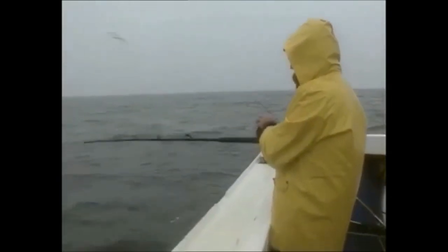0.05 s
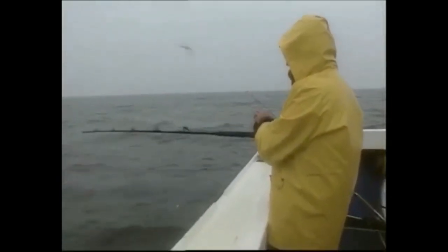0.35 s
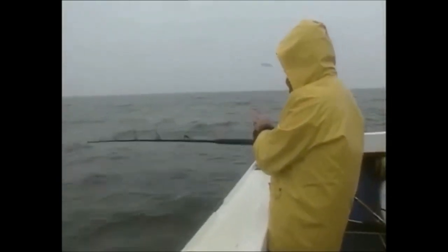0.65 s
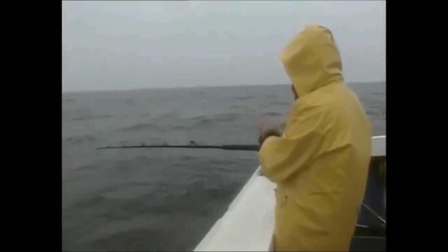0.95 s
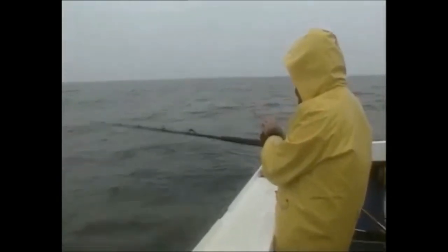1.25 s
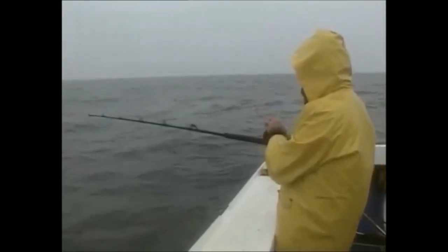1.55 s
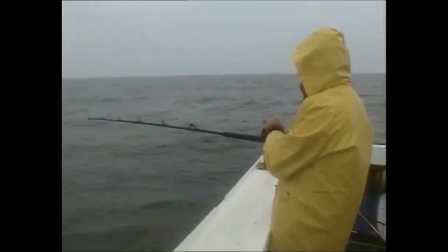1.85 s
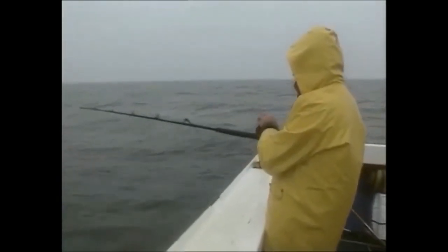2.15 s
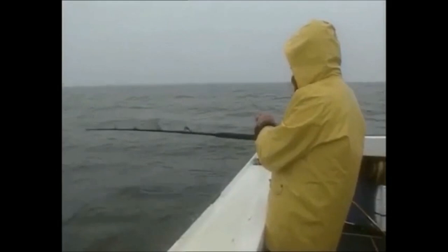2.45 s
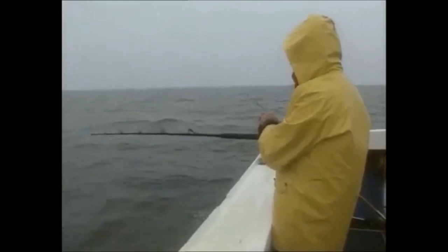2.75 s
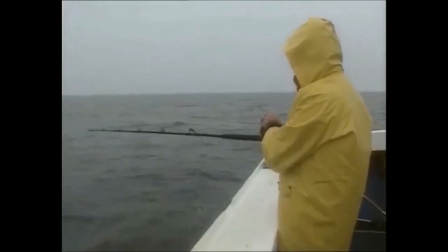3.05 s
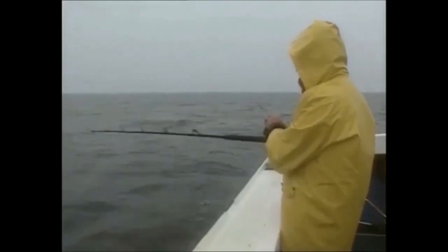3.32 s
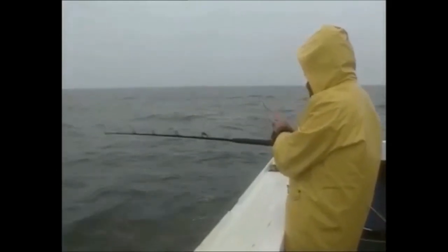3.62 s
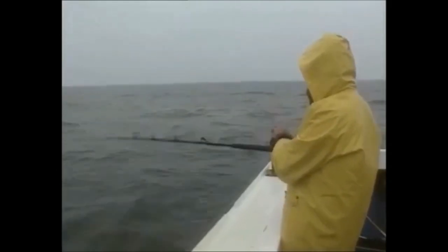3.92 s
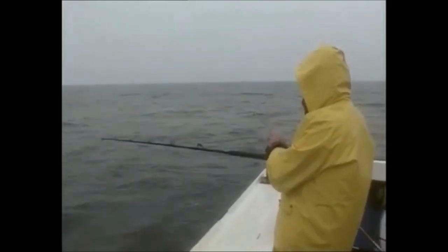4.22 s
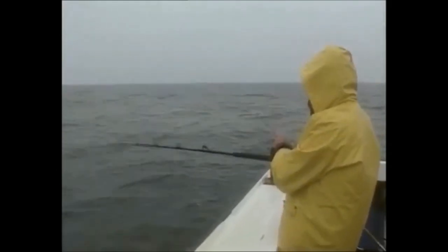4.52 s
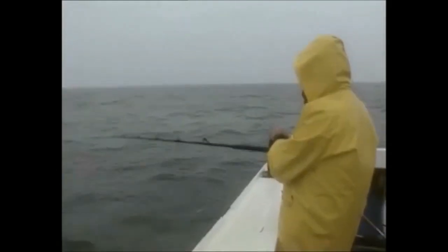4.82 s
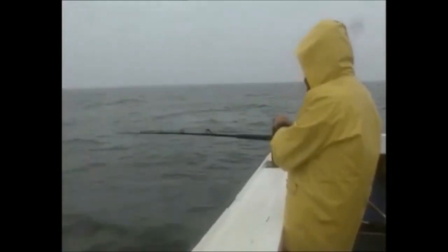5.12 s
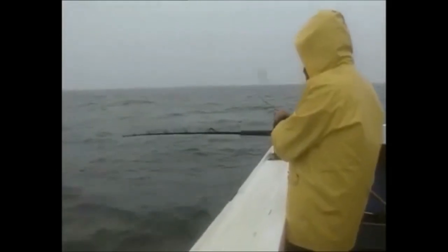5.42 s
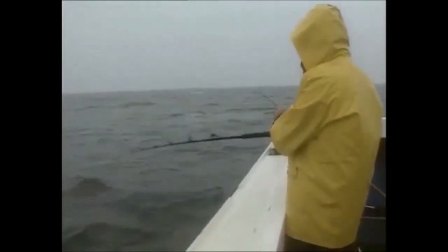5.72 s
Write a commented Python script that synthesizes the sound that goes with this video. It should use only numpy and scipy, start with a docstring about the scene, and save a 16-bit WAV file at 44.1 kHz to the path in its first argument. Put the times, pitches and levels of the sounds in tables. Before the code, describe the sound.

Line pulls off a fishing reel in bursts of rapid, bright clicking, while wind buffets the microphone and water washes along the hull.

```python
"""On a boat at sea, line is pulled off a fishing reel in spurts, and the ratchet clicks.
Each pull spins the spool up and lets it run down with a soft whirr; the pawl drops off every tooth
and rings the reel. Two faint squeaks, two hard snaps and a few lone clicks join the pulls.
Wind buffets the microphone, water washes and slaps along the hull, and foam fizzes now and then."""
import sys
import numpy as np
from scipy import signal
from scipy.fft import rfft, irfft, next_fast_len
from scipy.io import wavfile
from scipy.ndimage import uniform_filter1d

SR = 44100
rng = np.random.default_rng(int(sys.argv[2]) if len(sys.argv) > 2 else 0)


def log_audio(samples):
    """Write samples as a 16-bit WAV file to the path given in sys.argv[1]."""
    # one column per channel
    frames = np.atleast_2d(samples).T
    # limit to full scale, then quantise
    limited = np.clip(frames, -1, 1)
    pcm = np.round(limited * 32767).astype(np.int16)
    wavfile.write(sys.argv[1], SR, pcm)


N = 258911
TIME = np.arange(N) / SR
REFERENCE_TEETH_PER_S = 100

# wind on the microphone: t/s, relative rumble level/dB, relative buffet level/dB
WIND_LEVELS = [(0.0, -33, -48), (0.08, -34.5, -39.5), (1.23, -35.5, -40), (1.37, -42, -42),
               (1.54, -39.5, -54.5), (1.67, -44.5, -46), (1.89, -35, -45), (1.94, -43, -54.5),
               (2.21, -42, -41), (2.39, -46.5, -50), (2.5, -39, -45), (2.68, -41, -49.5), (2.94, -38, -40),
               (3.04, -41, -52.5), (3.16, -36, -41.5), (4.27, -60, -59.5), (4.59, -42.5, -47),
               (4.82, -51.5, -59.5), (4.94, -48, -53), (5.25, -39, -51), (5.43, -49.5, -55.5),
               (5.48, -45.5, -43.5), (5.79, -37, -46.5), (5.87, -47, -50.5)]
# brief lulls in the wind: t/s, half-length/s, depth/dB
WIND_LULLS = [(1.748, .03, -6.5), (2.692, 0.023, -8), (3.3, 0.03, -15), (3.62, 0.042, -5), (4.865, .03, -7)]
# tone of the large eddies and of the small ones: f/Hz, level/dB
RUMBLE_EQ = [(10, -27.5), (22, -10), (35, 3), (55, -4), (80, -13.5), (130, -27), (300, -65)]
BUFFET_EQ = [(35, -28), (72, 5.5), (110, -5), (170, -6.5), (250, -17), (400, -27), (800, -43.5),
             (2000, -79)]
# single gusts thumping the microphone: t/s, half-length/s, f/Hz, half-width/Hz, level/dB
GUST_THUMPS = [(0.113, 0.039, 60.4, 70, -33), (0.563, .04, 50, 70, -34), (0.711, 0.042, 45, 60, -34),
               (0.941, 0.028, 149, 129, -39.5), (1.109, 0.068, 110, 40, -41.5),
               (1.25, 0.024, 101, 141, -36), (2.18, 0.038, 75, 40, -36.5), (2.183, 0.023, 202, 130, -44),
               (2.502, .05, 40.4, 60.4, -35.5), (2.866, 0.049, 40, 50, -38), (2.96, 0.047, 108, 50, -49),
               (3.341, 0.026, 64, 50, -38.5), (4.604, .04, 50, 70, -45), (5.59, 0.022, 55, 70, -35)]
# water along the hull: t/s, relative level/dB
WATER_LEVELS = [(0.0, -51), (0.54, -59.5), (0.59, -70), (0.95, -55), (1.42, -59), (1.47, -64.5),
                (2.21, -54), (2.35, -65), (2.96, -55), (3.42, -67), (3.74, -53), (4.12, -59.5), (5.36, -66),
                (5.41, -57.5), (5.74, -75), (5.87, -60)]
# tone of the low slosh and of the brighter wash: f/Hz, level/dB
SLOSH_EQ = [(120, -30), (270, 3), (380, 3), (520, -0.5), (750, -5.5), (1500, -35.5)]
WASH_EQ = [(300, -43), (600, -7.5), (1000, 5), (1500, -2.5), (2500, -5.5), (5000, -7.5), (12000, -34.5)]
# pulls of line: start/s, end/s, teeth passed, moment of top speed/share of the pull,
# start and end speed/share of top speed, arch (1 pointed, 2 round), relative click level/dB,
# firmness of the pawl's seat (0-1), spring ping level/dB
LINE_PULLS = [(.0086, .4532, 56, .347, .596, .14, 1.975, -35.7, .82, -16),
              (.8546, 1.308, 70, .564, .112, .248, 1.706, -35.4, 1, -16),
              (1.7986, 2.2222, 44, .546, .036, .2, 1.754, -34.3, .85, -7),
              (2.6844, 3.1428, 46, .428, .16, .179, 1.896, -35.5, .3, -10),
              (3.5079, 3.7181, 12, .499, .345, .478, 1.886, -35.2, 0, -11.5),
              (3.9068, 4.2832, 19, .48, .037, .364, 1.024, -35.5, 0, -13),
              (4.5471, 4.908, 23, .47, .072, .214, 1.469, -36.2, 0, -25)]
# modes of the reel: f/Hz, width/Hz, level with the pawl firm/dB, level with it loose/dB
REEL_MODES = [(426, 500, -23.5, -26.5), (709, 160, -22, -19), (1038, 250, -23.5, -23),
              (1310, 130, -31, -26.5), (1557, 160, -23, -22.5), (2010, 234, -19, -21),
              (2430, 283, -15, -21.5), (3660, 580, -21, -16), (3930, 384, -11.5, -14),
              (4464, 680, -16, -15.5), (5350, 190, -40, -26.5), (6234, 290, -16.5, -17),
              (7225, 630, -9.5, -13.5), (7934, 540, 0, -9.5), (8180, 1100, -4.5, -23.5),
              (8785, 240, -6.5, -6.5), (9170, 160, -18, -11.5), (10050, 250, -19.5, -16),
              (11140, 390, -15, -17), (12450, 780, -35, -20.5)]
# tone of the pawl's chatter after it lands: f/Hz, level/dB
CHATTER_EQ = [(300, -21), (1600, -27), (2450, -10), (2900, -19), (3250, -21.5), (4000, -5), (5500, -11),
              (6300, -5), (6750, -10), (7900, -10.5), (9600, -1), (10700, -4.5), (12000, -13.5),
              (13500, -13)]
# tone of the spool and running line: f/Hz, level/dB
WHIRR_EQ = [(150, -16), (300, 5.5), (450, 2), (600, -0.5), (1000, 0), (1500, -8.5), (2500, -10),
            (5000, -16.5), (12000, -13.5)]
# close reflections off the rail and the angler's jacket: delay/s, level/dB
NEAR_ECHOES = [(.0037, -14.5), (.0066, -23.5)]
# patches of fizzing foam: t/s, half-length/s, f/Hz, half-width/Hz, level/dB
FOAM_PATCHES = [(0.438, 0.22, 6100, 790, -65), (.55, 0.13, 9500, 1100, -70), (.54, .18, 11800, 900, -73),
                (0.733, 0.18, 5050, 1100, -70), (2.524, .22, 5400, 2500, -74.5),
                (5.2, 0.16, 9900, 3300, -70), (5.2, 0.15, 6200, 2000, -79)]
# waves slapping the hull: t/s, half-length/s, f/Hz, level/dB
HULL_SLAPS = [(0.481, 0.075, 384, -54), (1.394, 0.056, 274, -51), (2.614, .03, 960, -68.5),
              (3.608, 0.043, 390, -56), (3.754, 0.095, 360, -52.5), (3.952, 0.099, 417, -57),
              (4.369, .06, 370, -57.5), (4.963, 0.047, 346, -56.5), (5.474, 0.04, 460, -57)]
# thin squeaks between pulls: t/s, half-length/s, f/Hz, half-width/Hz, level/dB
THIN_SQUEAKS = [(1.455, 0.043, 4230, 100, -82), (1.675, 0.0298, 4110, 130, -76.5)]
# hard snaps of the pawl: t/s, peak level/dB
PAWL_SNAPS = [(2.1801, -37), (2.1978, -21)]
# single teeth slipping past: t/s, relative level/dB
TOOTH_SLIPS = [(3.7797, -47.5), (4.3043, -68), (5.2837, -36.5), (5.3384, -36.5), (5.3824, -37),
               (5.5876, -39), (5.8243, -60)]
# thinner tone of a slipping tooth: f/Hz, level/dB
SLIP_EQ = [(1200, -0.5), (2500, -0.5), (3900, 1), (5000, -0.5), (8000, 0), (12500, 2.5)]
# the microphone's response and the tone of its hiss: f/Hz, level/dB
MICROPHONE_EQ = [(20, 0.5), (11000, 0), (12000, 3), (12600, -9), (13200, -14.5), (14000, -32)]
HISS_EQ = [(500, 4), (3000, -14), (6000, 2), (8200, 2), (9500, 10), (11000, 7), (12000, 3), (13000, -40)]


def gain_of(db):
    """Decibels to amplitude."""
    return 10 ** (np.asarray(db) / 20)


def unit_rms(x):
    """Scales to rms 1."""
    return x / np.sqrt(np.mean(x ** 2) + 1e-20)


def equalise(x, curve):
    """Filters the last axis by an EQ curve of f/Hz, level/dB."""
    hz, db = np.transpose(curve)
    bins = np.fft.rfftfreq(x.shape[-1], 1 / SR)
    response = gain_of(np.interp(np.log(bins + 1), np.log(hz + 1), db))
    return irfft(rfft(x) * response, x.shape[-1])


def noise(curve):
    """Steady noise of rms 1, shaped by an EQ curve."""
    return unit_rms(equalise(rng.standard_normal(N), curve))


def levelled(x, seconds):
    """Irons out the chance swells of a noise that last longer than the given time."""
    size = max(int(seconds * SR), 2)
    power = uniform_filter1d(uniform_filter1d(x ** 2, size), size)
    return x / np.sqrt(abs(power) + 1e-9)


def add(mix, at, sound):
    """Mixes a sound in at a time in seconds."""
    part = mix[max(round(at * SR), 0):][:len(sound)]
    part += sound[:len(part)]


def swell(at, half_length, hz, half_width, db):
    """A band of noise that fades in, peaks at the given time and fades out."""
    t = np.arange(-half_length * 1.5, half_length * 1.5, 1 / SR)
    size = next_fast_len(len(t))
    bins = np.fft.rfftfreq(size, 1 / SR)
    bell = np.exp(-2 * ((bins - hz) / half_width) ** 2)
    band = irfft(bell * np.exp(2j * np.pi * rng.random(len(bins))), size)[:len(t)]
    fade = np.exp(-2 * (t / half_length) ** 2)
    out = np.zeros(N)
    add(out, at + t[0], gain_of(db) * levelled(unit_rms(band), 0.068) * fade)
    return out


def flutter(slow_hz, fast_hz, count=24):
    """A random waver of rms 1 between two rates."""
    t = TIME[::64, None]
    waves = np.sin(2 * np.pi * (np.geomspace(slow_hz, fast_hz, count) * t + rng.random(count)))
    return np.interp(TIME, t[:, 0], unit_rms(waves.sum(1)))


def wander(shape, teeth=7):
    """Random values of spread 1 that drift slowly from tooth to tooth."""
    draws = rng.standard_normal((shape[0] + 2 * teeth, shape[1]))
    return uniform_filter1d(draws, teeth, 0)[teeth:-teeth] * np.sqrt(teeth)


def wind(flutter_db=2.5, rumble_flutter_share=0.28, buffet_trim_db=-1):
    """Eddies push on the microphone: large slow ones rumble, small ones buffet, a few thump."""
    times, low_db, high_db = np.transpose(WIND_LEVELS)
    eddies_db = flutter_db * flutter(7, 20)
    lulls_db = sum(db * np.exp(-((TIME - at) / half_length) ** 2) for at, half_length, db in WIND_LULLS)
    rumble_db = np.interp(TIME, times, low_db) + rumble_flutter_share * eddies_db
    buffet_db = np.interp(TIME, times, high_db) + buffet_trim_db + eddies_db
    rumble = levelled(noise(RUMBLE_EQ), 0.059) * gain_of(rumble_db)
    buffet = levelled(noise(BUFFET_EQ), 0.032) * gain_of(buffet_db)
    thumps = sum(swell(*row) for row in GUST_THUMPS)
    return (rumble + buffet) * gain_of(lulls_db) + thumps


def water(lapping_db=2.14, slosh_trim_db=-4, wash_db=-77, wash_follows=0.39, calm_db=-63.5):
    """Water sloshes along the hull; a brighter wash rides the same swells more gently."""
    level_db = np.interp(TIME, *np.transpose(WATER_LEVELS)) + lapping_db * flutter(3, 10)
    slosh = noise(SLOSH_EQ) * gain_of(level_db + slosh_trim_db)
    wash = noise(WASH_EQ) * gain_of(wash_db + wash_follows * (level_db - calm_db))
    return slosh + wash


def spool_speed(start, end, teeth, top_at, start_share, end_share, arch):
    """One pull spins the spool up and lets it run down. Gives times and teeth per second."""
    t = np.arange(start, end, 1 / SR)
    progress = np.linspace(0, 1, len(t))
    from_top = np.interp(progress, [0, top_at, 1], [1, 0, 1])
    edge_share = np.where(progress < top_at, start_share, end_share)
    contour = 1 - (1 - edge_share) * from_top ** arch
    return t, contour * round(teeth) / (np.mean(contour) * (end - start))


def reel_ring(t, speed, firmness, ping_db, spring_hz=10680, spring_width_hz=600):
    """The pawl's strike rings the reel's modes and pings its own spring. One row per tooth."""
    drift, uneven, detune = .25, .11, .002  # shares
    body_top_hz, body_db_per_doubling = 3000, 0.07
    spring = (spring_hz, spring_width_hz, ping_db, ping_db)
    hz, width, firm_db, loose_db = np.transpose(REEL_MODES + [spring])
    polarity = (-1.) ** np.arange(len(hz))  # neighbouring modes swing in opposite senses
    strength = gain_of(firmness * firm_db + (1 - firmness) * loose_db) * polarity * width ** 2
    modes = strength[:, None] * t * np.exp((2j * hz - width)[:, None] * np.pi * t)
    # the point of contact drifts as the wheel turns, and no two teeth are alike
    shape = (len(speed), len(hz))
    swing, skew = (drift * wander(shape) + uneven * rng.standard_normal(shape) for _ in range(2))
    shift_hz = detune * np.mean(hz) * rng.standard_normal((len(speed), 1))
    # faster teeth shake the body's low modes a touch harder
    doublings = np.log2(speed[:, None] / REFERENCE_TEETH_PER_S)
    body = gain_of(body_db_per_doubling * doublings * (hz < body_top_hz))
    strikes = body * (1 + swing + 1j * skew)
    return (strikes @ modes * np.exp(2j * np.pi * shift_hz * t)).real


def pawl_clicks(times, speed, level_db, firmness, ping_db, scatter_db=0.31):
    """The pawl drops off each tooth, rings the reel, rebounds once and chatters briefly."""
    rebound_db, rebound_s, rebound_wander = -9.5, .0019, .17
    chatter_db, chatter_rise_s, chatter_decay_s = -4, .0007, .0015
    t = np.arange(1024) / SR
    ring = reel_ring(t, speed, firmness, ping_db)
    force = gain_of(level_db + scatter_db * rng.standard_normal(len(times)))
    delay = rebound_s * np.exp(rebound_wander * wander((len(times), 1)))
    bins = np.fft.rfftfreq(len(t), 1 / SR)
    rebound = irfft(rfft(ring) * np.exp(-2j * np.pi * bins * delay), len(t))
    burst = np.exp(-t / chatter_decay_s) * (1 - np.exp(-(t / chatter_rise_s) ** 2))
    chatter = equalise(rng.standard_normal(ring.shape), CHATTER_EQ) * burst
    clicks = unit_rms(ring + gain_of(rebound_db) * rebound) + gain_of(chatter_db) * unit_rms(chatter)
    # a click's level is its energy spread over 2 ms
    clicks /= np.sqrt(np.sum(clicks ** 2, 1, keepdims=True) / (.002 * SR))
    out = np.zeros(N)
    for at, click in zip(times, clicks * force[:, None]):
        add(out, at, click)
    return out


def ratchet(trim_db=0.28):
    """Every tooth pulled past the pawl is one click; speed sets the pace, not the click's strength."""
    out = np.zeros(N)
    for *motion, level_db, firmness, ping_db in LINE_PULLS:
        t, speed = spool_speed(*motion)
        teeth_passed = np.cumsum(speed) / SR
        times = np.interp(np.arange(round(teeth_passed[-1]) + 1), teeth_passed, t)
        out += pawl_clicks(times, np.interp(times, t, speed), level_db + trim_db, firmness, ping_db)
    return out


def whirr(reference_db=-62, speed_power=0.12, lag_s=0.048):
    """The turning spool and running line make a soft rush that grows with speed and lingers briefly."""
    speed = sum(np.interp(TIME, *spool_speed(*motion), left=0, right=0)
                for *motion, _, _, _ in LINE_PULLS)
    pole = np.exp(-1 / (lag_s * SR))
    envelope = signal.lfilter([1 - pole], [1, -pole], (speed / REFERENCE_TEETH_PER_S) ** speed_power)
    return gain_of(reference_db) * envelope * noise(WHIRR_EQ)


def with_reflections(x):
    """Close reflections off rail and jacket lengthen each click a little."""
    out = x.copy()
    for delay, db in NEAR_ECHOES:
        add(out, delay, gain_of(db) * x)
    return out


def deck_tail(x, t60_s=0.29, rise_s=0.0066, send_db=-27):
    """Rail, deck and cabin throw back a faint, dull tail; the rest is lost over open water."""
    t = np.arange(SR // 2) / SR
    tail = rng.standard_normal(len(t)) * gain_of(-60 * t / t60_s) * (1 - np.exp(-t / rise_s))
    tail /= np.linalg.norm(tail)
    tail = equalise(tail, [(300, 11), (1000, 26), (2000, 13), (4000, 5), (9000, -3)])
    return signal.fftconvolve(gain_of(send_db) * x, tail)[:N]


def foam():
    """Patches of foam fizz in soft, high swells."""
    return sum(swell(*row) for row in FOAM_PATCHES)


def slaps(half_width_hz=220):
    """Waves hit the hull with short, hollow slaps."""
    return sum(swell(at, half_length, hz, half_width_hz, db) for at, half_length, hz, db in HULL_SLAPS)


def squeaks():
    """Two faint, narrow-band squeaks between pulls."""
    return sum(swell(*row) for row in THIN_SQUEAKS)


def snaps(decay_s=0.00025):
    """The pawl catches hard: a very short, bright crack."""
    t = np.arange(512) / SR
    out = np.zeros(N)
    for at, db in PAWL_SNAPS:
        crack = equalise(rng.standard_normal(len(t)), CHATTER_EQ) * np.exp(-t / decay_s)
        add(out, at, gain_of(db) * crack / np.max(abs(crack)))
    return out


def slips(teeth_per_s=20, trim_db=0.8):
    """The creeping spool lets the pawl down lightly, in lone, thinner clicks."""
    times, level_db = np.transpose(TOOTH_SLIPS)
    speed = np.full(len(times), teeth_per_s)
    clicks = pawl_clicks(times, speed, level_db + trim_db, firmness=0.065, ping_db=-30)
    return equalise(clicks, SLIP_EQ)


def scene():
    """The reel up close, over a bed of wind and sea, in mono."""
    reel = with_reflections(ratchet() + slips() + snaps()) + squeaks()
    return (reel + deck_tail(reel) + whirr() + wind() + water() + slaps() + foam())[None]


def record(dry):
    """A small microphone with a dull top, its own hiss and a steep high cut."""
    hiss_db, cutoff_hz = -74.5, 13700
    heard = equalise(dry, MICROPHONE_EQ) + gain_of(hiss_db) * noise(HISS_EQ)
    high_cut = signal.firwin(255, cutoff_hz, window=("kaiser", 9), fs=SR)
    return signal.oaconvolve(heard, high_cut[None], "same")


dry = scene()
out = record(dry)
log_audio(out)
```